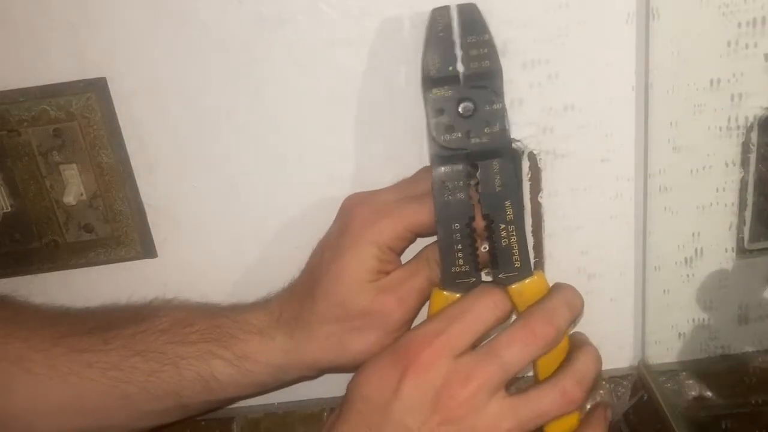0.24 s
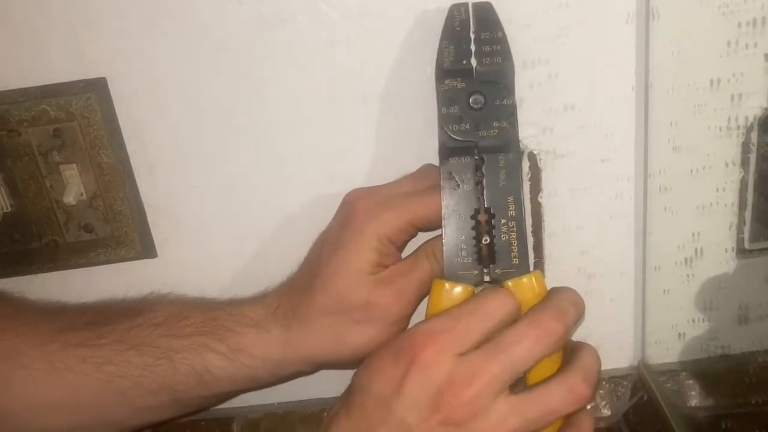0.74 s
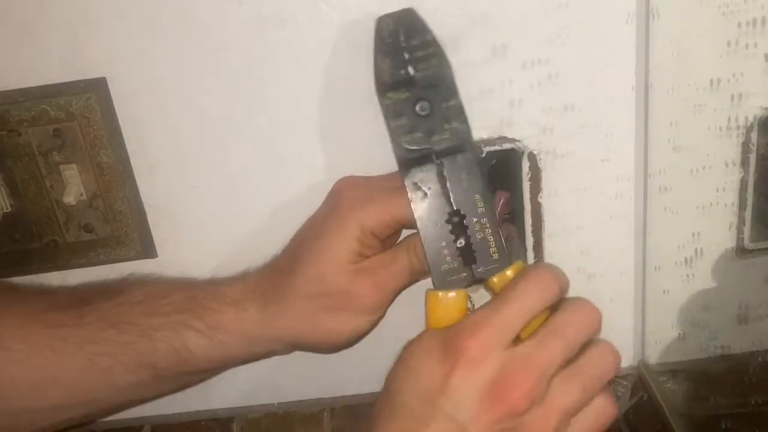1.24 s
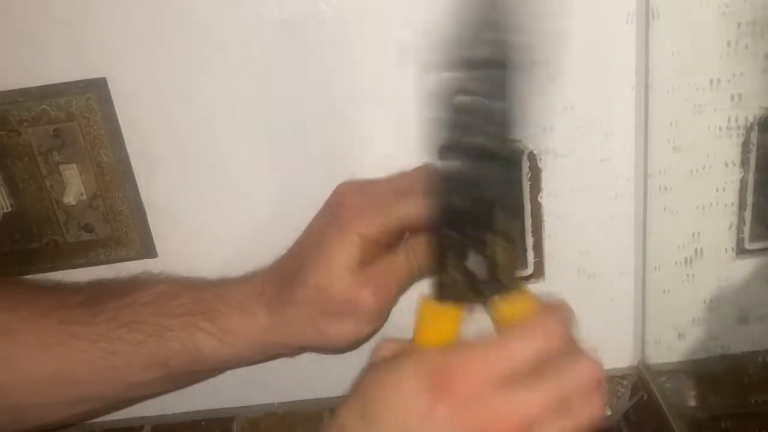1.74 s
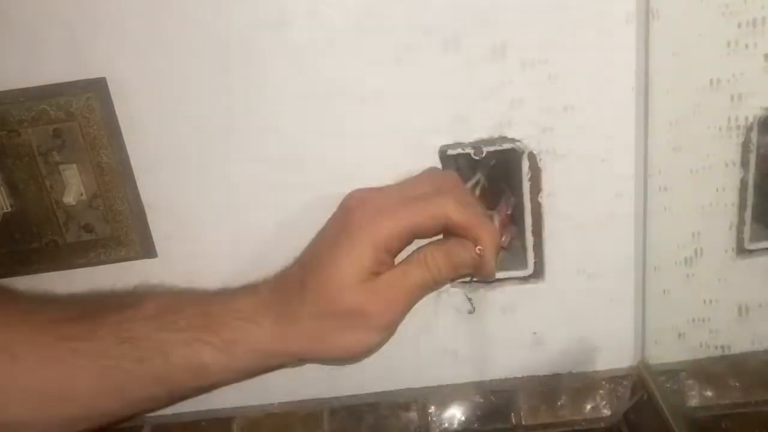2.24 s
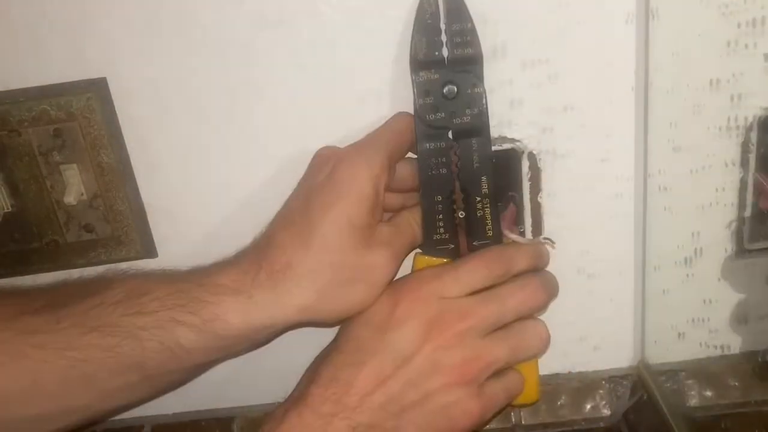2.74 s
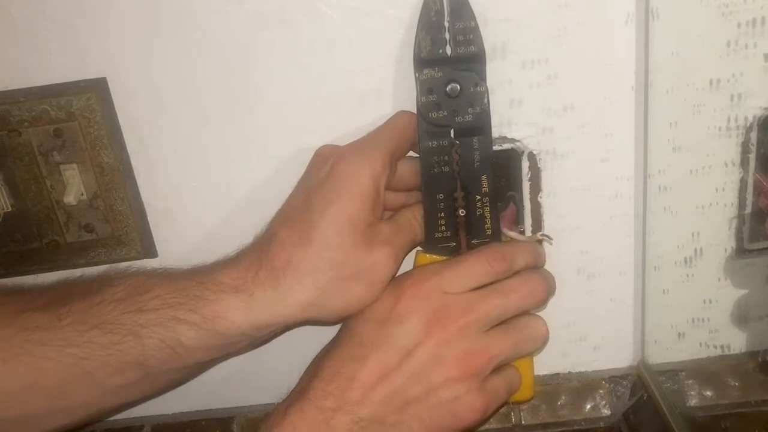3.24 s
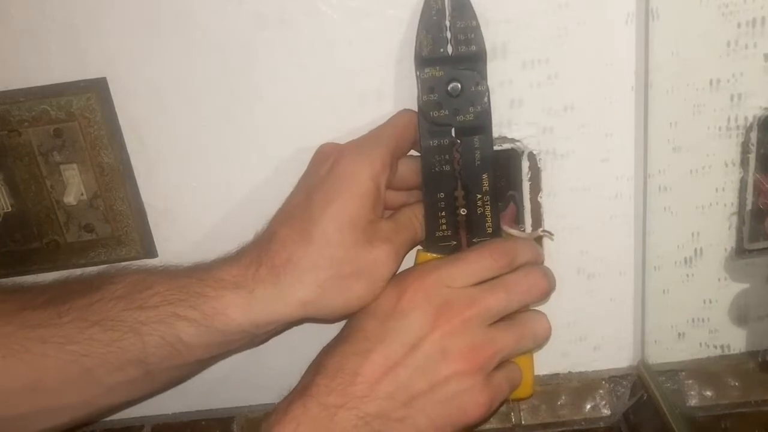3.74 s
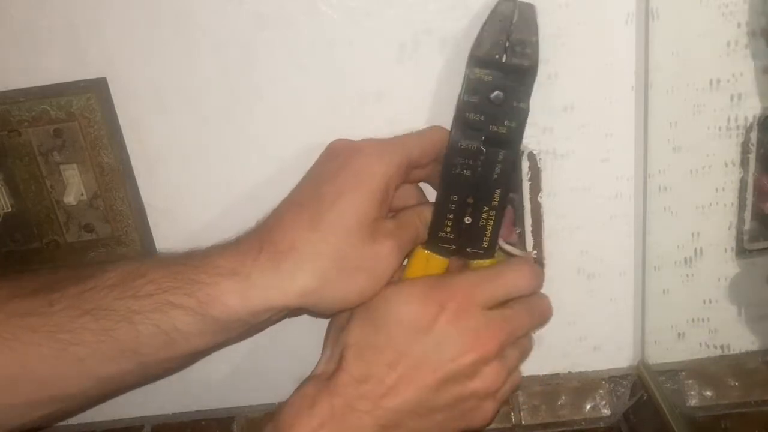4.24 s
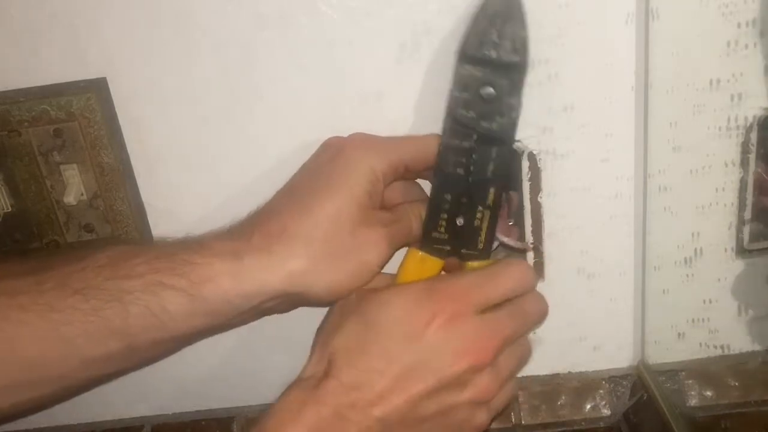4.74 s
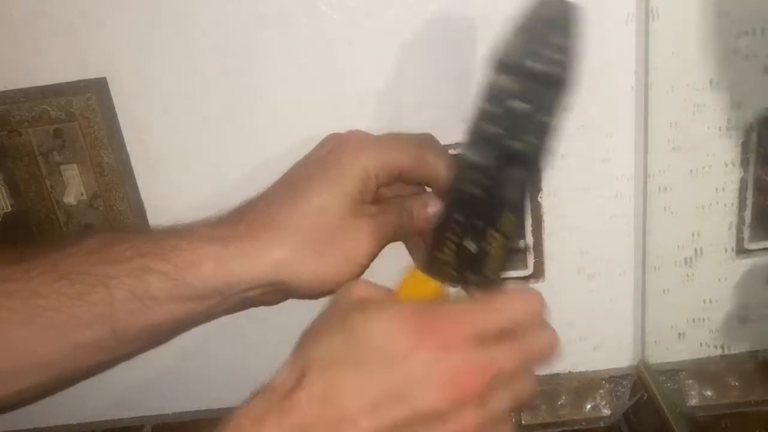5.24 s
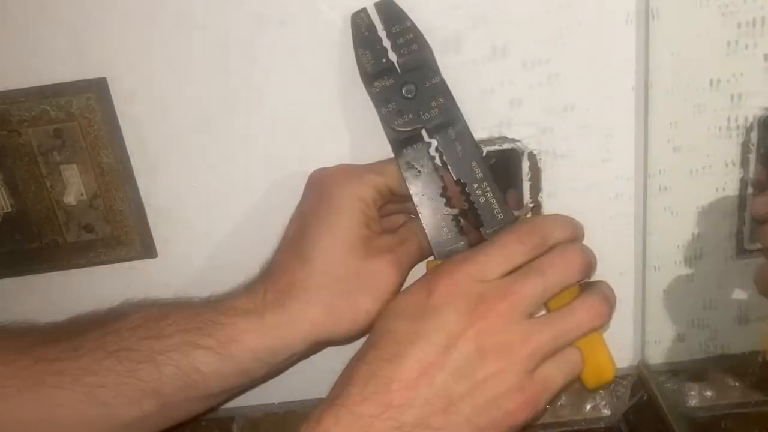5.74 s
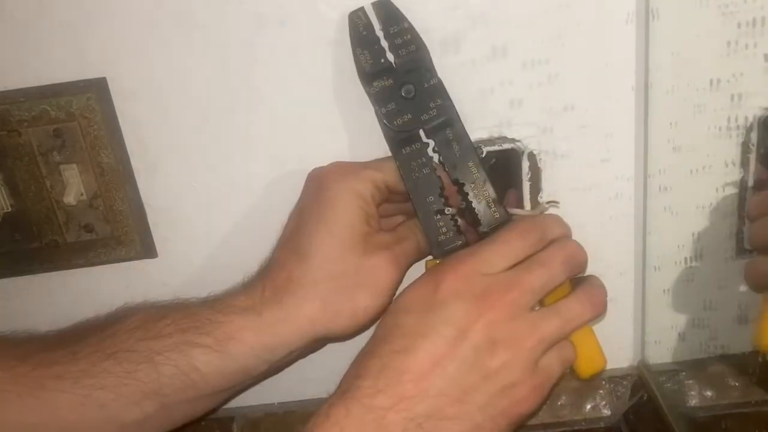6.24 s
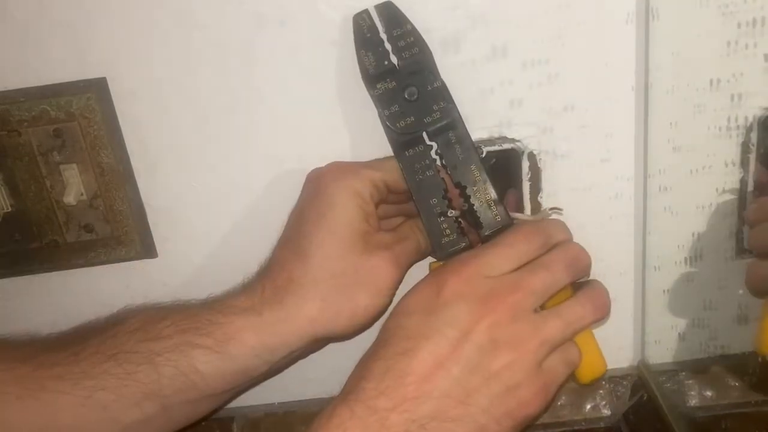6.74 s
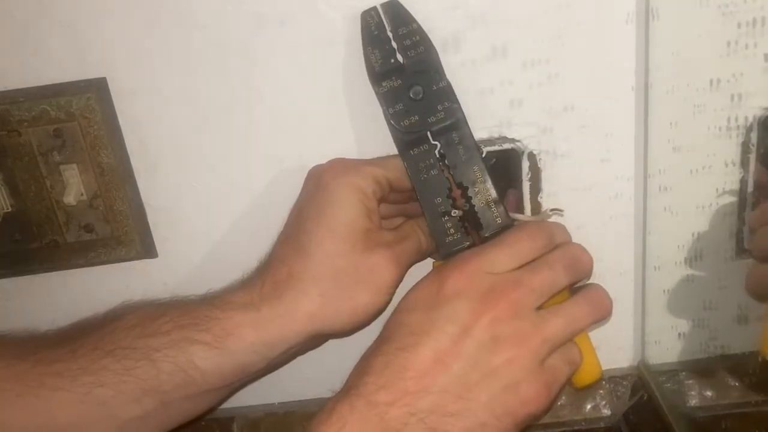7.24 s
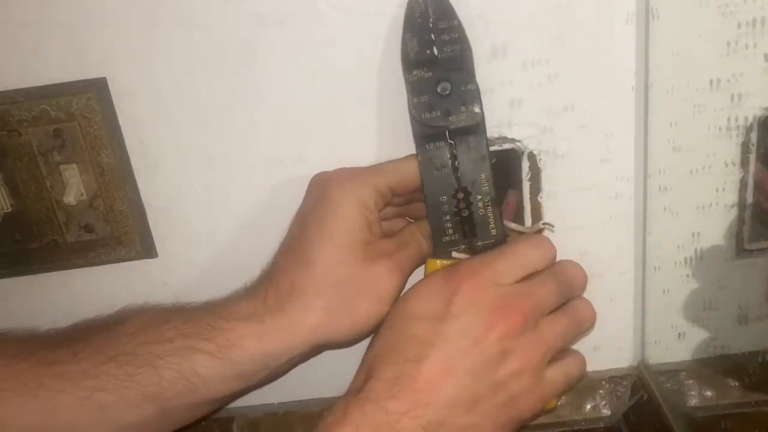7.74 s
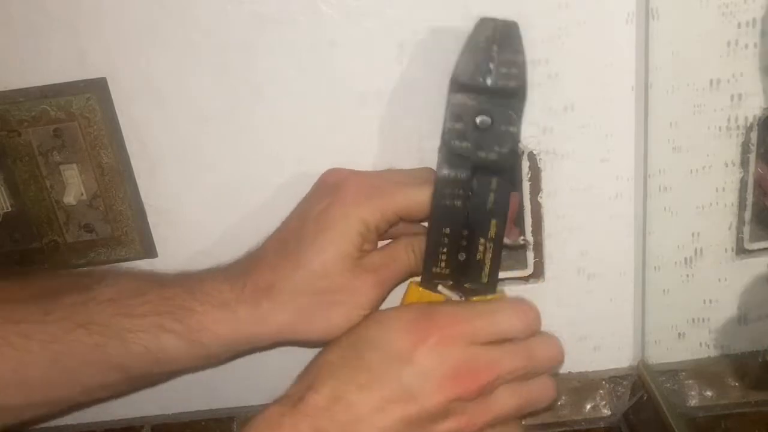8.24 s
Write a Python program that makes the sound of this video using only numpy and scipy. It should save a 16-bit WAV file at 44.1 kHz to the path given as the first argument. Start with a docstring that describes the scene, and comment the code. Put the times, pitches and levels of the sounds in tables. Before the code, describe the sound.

Close stereo sound of hands working at a wall box in a quiet indoor space: plastic handle clacks, steel snaps, gritty rubbing, tiny squeaks of jaws slipping on insulation, and dull hollow thuds when wires are pulled. It begins nearly silent, gets busy, thins to faint creaks, peaks in a bright snip around the middle, and ends in a cluster of clicks.

```python
"""A quiet room murmurs first; then a hand wire stripper works on the wires of an open wall box.
The steel tool clicks and snips as struck modes and noise bursts; tugs knock the box
and make the hollow wall boom, both by modal resonance. Stick-slip grains rub wires and jaws,
narrow noise chirps squeak, stirred air rumbles; a close stereo recorder listens."""
import sys
import numpy as np
from scipy import signal
from scipy.fft import rfft, irfft, next_fast_len
from scipy.io import wavfile

SR = 44100
rng = np.random.default_rng(int(sys.argv[2]) if len(sys.argv) > 2 else 0)


def bounce(signal):
    """Save signal as a 16-bit WAV file at the path given by the first command-line argument."""
    frames = np.transpose(np.atleast_2d(signal))
    limited = np.clip(frames, -1, 1)
    pcm = np.round(limited * 32767).astype(np.int16)
    wavfile.write(sys.argv[1], SR, pcm)


N = 374409   # samples


def from_db(db):
    """Logarithmic level: decibels to amplitude gain."""
    return 10 ** (np.asarray(db) / 20)


def rms_one(x):
    """Normalisation: scale to unit rms."""
    return x / np.sqrt(np.mean(x ** 2) + 1e-20)


def at_hz(points, hz):
    """Interpolation: read a table on a logarithmic frequency axis."""
    table_hz, value = np.array(points)[:, 0], np.array(points)[:, 1]
    return np.interp(np.log(np.maximum(hz, 1)), np.log(table_hz), value)


def coloured(x, spectrum):
    """Spectral shaping: filter noise to the colour of a table, at unit rms."""
    size = next_fast_len(N)
    hz = np.arange(size // 2 + 1) * SR / size
    inside = (hz > .8 * spectrum[0][0]) & (hz < 1.2 * spectrum[-1][0])
    shaped = rfft(x, size) * from_db(at_hz(spectrum, hz)) * inside
    return rms_one(irfft(shaped, size)[..., :N])


# likeness of the two channels of diffuse sound: (frequency [Hz], likeness [0 to 1])
DIFFUSE_LIKENESS = [(60, 0.94), (240, 0.048), (950, 0), (3000, 0), (6000, 0.17), (15000, 1)]


def diffuse(length):
    """Interchannel coherence: a noise pair, alike in bass and treble, unrelated in between."""
    hz = np.arange(length // 2 + 1) * SR / length
    alike = np.clip(at_hz(DIFFUSE_LIKENESS, hz), 0, 1)
    mid, side = rfft(rng.standard_normal((2, length)))
    pair = np.sqrt(1 + alike) * mid + np.sqrt(1 - alike) * side * [[1], [-1]]
    return irfft(pair, length) / np.sqrt(2)


# colour of the building's murmur and hiss: (frequency [Hz], relative level [dB])
ROOM_TONE = [(18, -21.5), (30, -25), (45, -4.5), (68, -2), (170, -17.5), (500, -25), (1500, -35),
             (4000, -39.5), (10000, -42), (16000, -42)]
ROOM_TONE_DB = -63.5   # rms


def room_tone():
    """Diffuse background field: low murmur of the building over a faint hiss."""
    return from_db(ROOM_TONE_DB) * coloured(diffuse(next_fast_len(N)), ROOM_TONE)


def drift(rate):
    """Low-pass random process: slow chance of spread 1, with its corner at rate [Hz]."""
    # computed at every 40th sample
    r = np.exp(-80 * np.pi * rate / SR)
    slow = signal.lfilter([1], [1, -2 * r, r * r], rng.standard_normal(N // 40 + 2002))[2000:]
    return np.interp(np.arange(N) / 40, np.arange(len(slow)), rms_one(slow))


def ring(force, hz, t60):
    """Damped resonance: a unit click sets a sine of height 1 ringing."""
    r, w = from_db(-60 / (t60 * SR)), 2 * np.pi * hz / SR
    return signal.lfilter([0, np.sin(w)], [1, -2 * r * np.cos(w), r * r], force + 1e-18)


MODE_PAN_DB = 4   # each mode radiates its own way: spread of each channel, in opposite senses


def strikes(times, level_db, modes, swell_s, scatter_db, centre_hz=None, focus_db=0, pan_db=MODE_PAN_DB):
    """Modal excitation: a blow feeds each mode during contact, so the ring swells before it dies."""
    out = 0
    level_db = level_db * np.ones((2, 1))      # one row of strengths for each output channel
    chance = rng.standard_normal((len(times), len(modes), 2))
    for k, (hz, mode_db, t60) in enumerate(modes):
        force = np.zeros((len(level_db), N + SR))
        scatter = scatter_db * chance[:, k, 0]
        pan = pan_db * chance[:, k, 1] * [[1], [-1]]
        strength_db = level_db + mode_db + scatter + pan
        if centre_hz is not None:           # the place of the blow favours modes near one pitch
            strength_db = strength_db - focus_db * np.log2(hz / centre_hz) ** 2
        for s, db, swell in zip(times, strength_db.T, swell_s):
            n = np.arange(int(np.clip(swell, 1 / SR, .08) * SR * 2) + 1)
            contact = np.sin(np.pi * (n + .5) / len(n)) * np.pi / len(n)
            push = contact * np.cos(2 * np.pi * hz * n / SR)
            at = round(s * SR)
            force[:, at:at + len(n)] += from_db(db)[:, None] * push
        out = out + ring(force[:, :N], hz, t60) * (-1) ** k   # neighbouring modes in opposite phase
    return out


GRIP_SHIFT_DB = 4.0   # spread of each mode's level as the grip shifts


def rubbed(modes, force, damping, pan_db=MODE_PAN_DB):
    """Damped modes under friction: damping scales the ring times, the shifting grip the mode levels."""
    out = 0
    for k, (hz, db, t60) in enumerate(modes):
        pan = pan_db * drift(3.6) * [[1], [-1]]
        mode_db = db + pan + GRIP_SHIFT_DB * drift(9.0)
        out = out + from_db(mode_db) * ring(force, hz, t60 * damping) * (-1) ** k
    return rms_one(out)


RATTLE_RING = 0.52   # gain of ringing modes against plain noise of gain 1


def bursts(times, level_db, rise_s, centre_hz, spectrum, t60, tail_t60, tail_db, focus, width=1.12, body=None):
    """Two-stage decay: noise rises, drops fast and leaves a fainter rattle, focused on its own pitch."""
    out, t = np.zeros((2, N + SR)), np.arange(SR // 4) / SR
    # doubled in length so that late bursts still find noise
    noise = np.tile(coloured(rng.standard_normal(N), spectrum), 2)
    if body:        # the rattle sings in the modes of the thing that rattles
        singing = rubbed(body, noise[:N], 1.0, pan_db=1.5)[0]
        noise = noise + RATTLE_RING * np.tile(singing, 2)
    for s, db, rise, hz in zip(times, level_db.T, np.clip(rise_s, 2e-4, .04), centre_hz):
        at = round(s * SR)
        grit = noise[at:at + len(t)]
        band = signal.butter(1, [hz / width, hz * width], "band", fs=SR)
        grit = rms_one(grit + focus * signal.lfilter(*band, grit))
        after = np.maximum(t - rise, 0)
        decay = from_db(-60 * after / t60) + from_db(tail_db - 60 * after / tail_t60)
        shape = np.minimum(t / rise, 1) * decay
        out[:, at:at + len(t)] += from_db(db)[:, None] * shape * grit
    return out[:, :N]


# clicks, levels before the layer trims:
# (time [s], plastic clack [dB], steel snap [dB], treble tick [dB])
CLICKS = [(0.612, -36.5, -64, -76), (0.795, -53, -73, -70), (0.945, -29.5, -55.5, -56),
          (0.971, -37, -70, -57), (1.052, -29, -83, -70), (1.091, -33, -70, -90), (1.153, -35, -67, -80),
          (1.225, -34, -58.5, -62), (1.291, -27, -69, -49.5), (1.364, -25.5, -51, -82),
          (1.428, -18.5, -32, -38.5), (1.517, -29, -53, -52.5), (1.671, -17.5, -33.5, -31.5),
          (1.71, -19.5, -32, -38), (2.011, -48, -55.5, -62), (2.046, -32.5, -60, -69),
          (2.116, -28.5, -52.5, -52.5), (2.175, -58, -77, -56), (2.324, -35.5, -85, -79),
          (2.339, -33.5, -61, -60), (2.44, -39, -51, -55), (2.518, -22, -46, -55.5),
          (2.628, -38.5, -54, -58.5), (2.753, -51, -55, -58.5), (2.799, -32, -59, -66),
          (2.856, -54, -58.5, -56), (2.993, -32, -48, -75), (3.057, -45, -61, -56.5),
          (3.489, -44, -63.5, -71), (3.564, -43, -50.5, -55.5), (3.678, -54, -66, -77),
          (3.767, -32.5, -51, -52.5), (3.942, -31, -47.5, -58), (3.961, -29, -50, -62),
          (4.001, -17.5, -62, -68), (4.222, -34, -36.5, -37.5), (4.262, -60, -63, -51),
          (4.323, -47, -57, -75), (4.434, -24, -30.5, -41.5), (4.551, -22, -73, -70),
          (4.642, -37, -52, -79), (4.669, -32.5, -62, -75), (4.722, -29.5, -47, -58.5),
          (4.9, -54, -75, -71), (4.982, -50, -80, -87), (5.037, -18, -33, -33.5), (5.158, -30, -39, -75),
          (5.175, -15.5, -48, -31), (5.181, -9, -11.5, -38), (5.257, -40, -41, -68), (5.372, -36, -58, -62),
          (5.446, -37, -69, -68), (5.467, -33.5, -58, -70), (5.492, -40, -42.5, -56.5),
          (5.629, -40.5, -55.5, -77), (5.745, -42, -63, -66), (5.814, -22.5, -42.5, -56.5),
          (5.966, -34, -64.5, -74), (5.978, -30.5, -57.5, -65), (6.043, -34.5, -73.5, -77),
          (6.076, -15.5, -33.5, -45), (6.21, -53, -55.5, -64), (6.289, -54.5, -52.5, -57),
          (6.335, -53, -60.5, -67.5), (6.358, -47.5, -60, -60.5), (6.423, -47, -61.5, -61),
          (6.554, -50, -60, -87), (6.62, -42.5, -61, -82.5), (6.682, -60, -73.5, -84),
          (6.965, -44, -56, -79.5), (7.074, -50, -50, -73), (7.353, -62.5, -64.5, -52),
          (7.382, -33, -53, -54.5), (7.392, -23, -40.5, -48.5), (7.409, -32.5, -35, -39),
          (7.432, -22, -43, -53.5), (7.579, -34.5, -62, -72), (7.713, -35, -48, -64),
          (7.902, -33, -53, -58), (7.964, -45, -58.5, -60), (8.072, -37.5, -32.5, -42.5),
          (8.103, -20, -40.5, -55), (8.195, -27.5, -50, -82), (8.227, -45, -50, -74),
          (8.249, -24, -33, -54.5), (8.314, -28.5, -43.5, -57), (8.338, -26, -52, -77),
          (8.366, -23, -41, -51.5), (8.416, -20.5, -36.5, -52), (8.451, -22, -35, -50.5),
          (8.472, -18, -34.5, -47), (8.484, -25, -45, -55)]
# modes of handle and insulation, then of the jaws: (frequency [Hz], relative level [dB], t60 [s])
PLASTIC = [(938, -3.5, 0.062), (1046, 3, 0.026), (1012, -1, 0.083), (1184, -7.5, 0.04), (1261, -6.5, 0.055),
           (1370, -5, 0.03)]
STEEL = [(1781, 2, 0.011), (1817, 4.5, 0.056), (2244, -10, 0.08), (2510, -6, 0.078), (2774, -7, 0.042),
         (2880, -5.5, 0.036), (3403, -10, 0.091), (3616, -11, 0.043), (4092, -10.5, 0.066),
         (4430, -12, 0.04), (5600, -21, 0.027)]
# noise colours of snap, tick, shutting jaws and dry crunch: (frequency [Hz], relative level [dB])
CRACK = [(900, -20), (1450, -0.5), (1800, 0), (2300, 3), (2950, 6), (3350, 5.5), (3900, 2.5), (4600, -2.5),
         (5200, -11.5), (6500, -14)]
TICK = [(4500, -3.5), (6000, 1.5), (8500, 4.5), (12000, 1.5), (16000, -8)]
SLAM = [(2200, -9), (2850, 2), (3300, 0.5), (4000, 1), (4800, -17)]
CRUNCH = [(250, 4), (700, -1.5), (1050, -7), (1400, -16.5), (2000, -19), (2700, -23.5)]
# the wire parts and the jaws slam shut: (time [s], ring of all modes [dB], bright crack [dB])
SNIP = (5.183, -28.5, -5.5)
# the snap sits higher on the first wire than on the later ones, which start at REGRIP_S
FIRST_SNAP_HZ, LATER_SNAP_HZ, REGRIP_S = 2860, 1744, 1.8
# the handle creaks five times at an even pace; level before the layer trims
CREAK_START_S, CREAK_STEP_S, CREAK_DB = 3.164, .055, -48


def tool_clicks():
    """Impact of light bodies: clack of handle and insulation, snap and ring of steel jaws, thin tick."""
    creaks = [(CREAK_START_S + CREAK_STEP_S * k, CREAK_DB, CREAK_DB - 24.5, CREAK_DB - 38) for k in range(5)]
    s, clack_db, snap_db, tick_db = np.transpose(CLICKS + creaks)
    snap_hz = np.where(s < REGRIP_S, FIRST_SNAP_HZ, LATER_SNAP_HZ)
    snap_hz = snap_hz * 2 ** (.12 * rng.standard_normal(len(s)))   # spread in octaves
    # the hand shades each click differently, left against right in dB
    sides = 3.0 * rng.standard_normal(len(s)) * [[1], [-1]]
    rise = np.full(len(s), .0012)   # s
    clack = strikes(s, clack_db + sides - 14, PLASTIC, 0.18 * rise, scatter_db=4.5)
    steel = strikes(s, snap_db + sides - 9.5, STEEL, 2.3 * rise, scatter_db=1.5,
                    centre_hz=snap_hz, focus_db=5.5)
    snap = bursts(s, snap_db + sides + 0.5, rise, snap_hz, CRACK,
                  t60=0.011, tail_t60=0.17, tail_db=-5.0, focus=1.8, body=STEEL)
    tick = bursts(s, np.tile(tick_db + 4.5, (2, 1)), rise, 3 * snap_hz, TICK,
                  t60=0.019, tail_t60=0.14, tail_db=-10, focus=0.057)
    crunch = bursts(s, clack_db + sides - 14.5, rise, np.full(len(s), 1150), CRUNCH,
                    t60=0.062, tail_t60=0.12, tail_db=-13.0, focus=5.6, body=PLASTIC)
    slam_ring = strikes(SNIP[:1], np.array(SNIP[1:2]), STEEL, [.0006], scatter_db=3.5)
    slam_crack = bursts(SNIP[:1], np.full((2, 1), SNIP[2]), rise, [3900], SLAM,
                        t60=0.012, tail_t60=0.18, tail_db=-12.5, focus=2.7, body=STEEL)
    return clack + crunch + steel + snap + tick + slam_ring + slam_crack


# knocks and tugs on the box, levels before the layer trims:
# (time [s], box [dB], lower long side [dB], upper long side [dB])
KNOCKS = [(0.945, -44, -59, -71), (1.16, -41, -65, -80), (1.294, -35.5, -49, -48), (1.368, -37, -58, -46),
          (1.43, -22, -45.5, -27), (1.671, -16, -34, -25), (1.705, -29, -35, -37), (1.866, -47, -55, -75),
          (2.115, -35.5, -53, -36.5), (2.523, -26.5, -43, -59), (2.751, -32.5, -51, -46),
          (2.857, -34, -50.5, -42), (2.997, -27, -50.5, -45), (3.033, -36, -56, -49),
          (3.563, -34, -62, -57.5), (3.791, -30, -57, -45.5), (3.915, -35, -45, -65),
          (3.947, -33, -33.5, -45), (4.023, -47, -44.5, -65), (4.224, -37, -55, -51),
          (4.437, -23.5, -43, -42), (4.468, -40.5, -61, -64), (4.556, -23, -31, -46),
          (4.899, -30.5, -54.5, -74), (5.04, -17, -40, -37), (5.129, -30.5, -41.5, -57),
          (5.176, -13.5, -36, -27), (5.27, -37, -48.5, -35), (5.739, -37, -54.5, -75),
          (5.814, -22, -49, -38), (5.86, -42.5, -65, -54), (6.005, -32.5, -40.5, -50),
          (6.079, -12.5, -24, -27.5), (6.213, -34, -44, -63.5), (6.287, -25.5, -46, -52),
          (6.336, -33.5, -40.5, -49.5), (6.424, -33, -41, -52), (6.474, -59, -51.5, -61.5),
          (6.561, -39.5, -50.5, -65.5), (6.625, -44.5, -49, -58), (6.971, -37.5, -48, -52.5),
          (7.049, -29.5, -46.5, -61), (7.133, -34.5, -43, -68), (7.39, -10, -28, -32),
          (7.404, -18, -14, -26.5), (7.432, -23.5, -21, -45), (7.519, -53, -41.5, -61),
          (7.61, -43.5, -51, -57), (7.699, -22, -37.5, -59), (7.901, -32.5, -59, -71),
          (8.073, -23, -52, -38), (8.25, -30, -66, -47), (8.329, -49, -71, -44), (8.427, -34.5, -61, -37)]
# modes of the box, then of its long sides, the lower a close pair:
# (frequency [Hz], relative level [dB], t60 [s])
BOX = [(271.2, -7, 0.11), (338, -2, 0.19), (404, 7, 0.036), (544.5, 2, 0.077), (741, -8, 0.09),
       (894, -6, 0.046)]
BOX_SIDES = [(448.7, -6, 0.13), (460.5, -3, 0.15), (629.3, -4.5, 0.16)]
# contact lasts longer under a stronger tug: lightest, extra at 0 dB, power of the strength
LIGHT_CONTACT_S, HEAVY_CONTACT_S, CONTACT_POWER = 0.0042, 0.02, 0.94


def box_knocks():
    """Contact time and resonance: the box rings soon; its two long sides take longer to swing up."""
    s, box_db, low_db, high_db = np.transpose(KNOCKS)
    contact = LIGHT_CONTACT_S + HEAVY_CONTACT_S * from_db(CONTACT_POWER * box_db)
    box = strikes(s, box_db - 16.5, BOX, 0.51 * contact, scatter_db=2.5)
    low = strikes(s, low_db + 11, BOX_SIDES[:-1], 1.4 * contact, scatter_db=1.5, pan_db=1)
    high = strikes(s, high_db + 8, BOX_SIDES[-1:], 1.3 * contact, scatter_db=1, pan_db=1)
    # wires jammed in the box crunch; a longer contact makes the crunch rise more slowly
    crunch = bursts(s, np.tile(box_db - 16.0, (2, 1)), 2 * contact, np.full(len(s), 900), CRUNCH,
                    t60=0.035, tail_t60=0.3, tail_db=-3.5, focus=0)
    return box + low + high + crunch


# pulls that make the wall panel boom: (time [s], level [dB], centre frequency [Hz])
THUDS = [(0.961, -38, 110), (1.431, -33, 112), (1.686, -37, 121), (1.797, -23.5, 80.5), (1.85, -43, 80),
         (2.401, -38.5, 128), (2.532, -34.5, 107), (2.754, -42, 143), (2.81, -34, 183), (2.867, -28.5, 195),
         (3.017, -23, 94), (3.04, -31, 96.5), (3.563, -37.5, 184), (3.793, -43, 171), (3.942, -31.5, 112),
         (4.448, -32.5, 105), (4.558, -25.5, 122), (4.724, -32, 102), (4.904, -38.5, 111),
         (5.059, -16, 104), (5.189, -10.5, 101), (5.493, -41, 89.7), (5.742, -36, 103), (5.812, -21, 159.5),
         (6.077, -13, 193), (6.095, -11.5, 104), (6.309, -26, 111), (6.437, -36, 116.7),
         (6.623, -36, 126.3), (6.948, -33.5, 110.5), (7.05, -42.5, 121), (7.149, -30.5, 111),
         (7.393, -10, 164.3), (7.412, -13, 128), (7.438, -14.5, 178.5), (7.709, -16.5, 127),
         (7.92, -39, 113.2), (8.089, -32, 99), (8.205, -23.5, 90)]
# modes of the wall panel: (frequency [Hz], relative level [dB], t60 [s])
WALL = [(75, -7, 0.39), (101.9, -0.5, 0.33), (120.2, -2.5, 0.2), (150.4, -3, 0.24), (189.5, -5.5, 0.15),
        (219.4, -10, 0.27)]
THUD_SWELL_S = 0.0206


def wall_thuds():
    """Panel resonance: a pull slowly swings up the modes nearest its place, around the listed time."""
    s, level_db, centre_hz = np.transpose(THUDS)
    swell = np.full(len(s), THUD_SWELL_S)
    return strikes(s - 0.63 * swell, level_db, WALL, swell, scatter_db=1.0,
                   centre_hz=centre_hz, focus_db=26.0, pan_db=0)


def strokes(rows, rise_db_per_s, fall_db_per_s):
    """Power summation: strokes rise, hold and fall, overlaps add in power; one gain per level column."""
    t, power = np.arange(0, N + 64, 64) / SR, 0
    for start, hold, *level_db in rows:
        before = np.maximum(start - t, 0)
        after = np.maximum(t - start - hold, 0)
        lack_db = rise_db_per_s * before + fall_db_per_s * after
        power = power + from_db(np.array(level_db)[:, None] - lack_db) ** 2
    return [np.interp(np.arange(N) / SR, t, np.sqrt(p)) for p in power]


def grains(per_s, spread_db, clump_db):
    """Stick-slip: random clicks of uneven size that come in clumps."""
    sizes = from_db(spread_db * np.minimum(rng.exponential(1, N), 5)) * rng.choice([-1, 1], N)
    chance = per_s * from_db(clump_db * drift(14.0)) / SR
    return sizes * (rng.random(N) < chance)


# the hands lean on the box and shift it, then the resting grip on the wire, before the layer trims:
# (start [s], hold [s], wall rumble [dB], box rattle [dB])
SHOVES = [(0.99, 0.014, -54, -49.5), (1.12, 0.27, -55, -51.5), (1.44, 0.015, -43, -34.5),
          (1.69, 0.077, -33, -34.5), (2.11, 0.022, -57, -45.5), (2.37, 0.022, -54, -43.5),
          (2.53, 0.022, -46.5, -45), (2.76, 0.064, -50, -45.5), (3.0, 0.018, -44, -50),
          (3.17, 0.48, -63, -60), (3.57, 0.05, -66, -53.5), (3.68, 0.0091, -51.5, -52),
          (3.78, 0.095, -66, -50), (3.95, 0.042, -37, -42), (4.07, 0.068, -55, -45.5),
          (4.23, 0.01, -48.5, -52.5), (4.33, 0.14, -58, -53), (4.56, 0.034, -43.5, -46),
          (4.7, 0.052, -40.5, -45), (4.88, 0.041, -54, -53), (5.06, 0.21, -36, -42),
          (5.3, 0.21, -48.5, -46.5), (5.5, 0.029, -60, -51.5), (5.62, 0.031, -67, -65),
          (5.81, 0.029, -39.5, -49), (5.98, 0.13, -42, -52), (6.13, 0.3, -41.5, -45.5),
          (6.43, 0.022, -45, -49.5), (6.6, 0.029, -62.5, -53), (6.8, 0.049, -57.5, -76),
          (7.07, 0.04, -40.5, -49), (7.24, 0.048, -45.5, -53), (7.45, 0.15, -37.5, -50),
          (7.84, 0.023, -47.5, -47), (8.1, 0.092, -43.5, -36.5), (8.27, 0.13, -52, -51.5),
          (8.44, 0.038, -46, -37)]
GRIP = (0.96, 7.6, -63, -68.5)
# jaws and wires slide, before the layer trims:
# (start [s], hold [s], scrape [dB], rasp [dB], hiss [dB])
SLIDES = [(0.96, 0.22, -68, -86, -82), (1.22, 0.084, -63.5, -73, -57.5), (1.3, 0.17, -60, -56.5, -63),
          (1.7, 0.07, -47, -50, -56), (1.78, 0.076, -50.5, -55, -61), (2.11, 0.046, -66, -70, -68),
          (2.33, 0.05, -76.5, -77, -68.5), (2.385, 0.0073, -59, -67, -64), (2.52, 0.025, -57, -91, -87),
          (2.63, 0.076, -63, -99, -87), (2.75, 0.048, -54.5, -75, -83), (3.01, 0.031, -61.5, -62, -75),
          (3.94, 0.031, -46.5, -61, -59.5), (4.03, 0.2, -59.5, -72.5, -69.5), (4.24, 0.23, -58, -71, -74.5),
          (4.56, 0.029, -55, -69, -83), (4.65, 0.068, -48.5, -65, -69.5), (4.87, 0.013, -51, -87, -75),
          (4.95, 0.12, -58, -90, -92), (5.07, 0.17, -51, -64.5, -65), (5.37, 0.037, -51.5, -59.5, -66),
          (5.46, 0.051, -58, -51.5, -57), (5.55, 0.076, -60.5, -56.5, -61), (5.68, 0.036, -81, -64, -69.5),
          (5.81, 0.035, -63, -90, -87), (6.085, 0.03, -45.5, -64, -70), (7.1, 0.15, -69.5, -87, -100),
          (7.6, 0.17, -68.5, -79.5, -78), (7.8, 0.092, -63.5, -74, -63.5), (7.9, 0.017, -54, -70.5, -80.5),
          (8.09, 0.077, -44.5, -55.5, -60), (8.2, 0.038, -48.5, -68, -83), (8.26, 0.026, -53, -75, -69),
          (8.33, 0.041, -47.5, -78.5, -64), (8.43, 0.05, -55, -64, -73)]
# noise colours of the sliding: (frequency [Hz], relative level [dB])
SCRAPE = [(1000, 4), (1500, 13.5), (2000, -2), (2800, -1.5), (3600, -24)]
RASP = [(3000, -3.5), (4300, 1), (5200, -8.5), (6000, -15)]
HISS = [(5000, -12), (6200, 0.5), (8500, 10), (11000, 7.5), (14000, 5.5), (16000, -2.5)]
SHOVE_RISE_DB_PER_S, SHOVE_FALL_DB_PER_S = 195, 129
SLIDE_RISE_DB_PER_S, SLIDE_FALL_DB_PER_S = 247.5, 195.5
PRESSURE_WAVER_DB = 1.5   # spread of the fine grains' level


def rubbing():
    """Friction excitation: it shakes wall and box, scrapes steel, rasps on teeth, hisses on insulation."""
    wall_gain, box_gain = strokes(SHOVES + [GRIP], SHOVE_RISE_DB_PER_S, SHOVE_FALL_DB_PER_S)
    scrape_gain, rasp_gain, hiss_gain = strokes(SLIDES, SLIDE_RISE_DB_PER_S, SLIDE_FALL_DB_PER_S)
    rumble = rubbed(WALL, rng.standard_normal(N), damping=0.34, pan_db=0)
    wall = wall_gain * from_db(2.7 * drift(16.0)) * rumble

    slips = grains(600, spread_db=4.0, clump_db=5.5)
    rattle = 0.97 * rubbed(BOX, slips, damping=0.83) + 0.38 * rubbed(BOX_SIDES, slips, damping=1.0)
    box = box_gain * (rattle + 0.2 * rubbed(PLASTIC, slips, damping=0.7))

    fine = grains(4800, spread_db=2.5, clump_db=5.5) * from_db(PRESSURE_WAVER_DB * drift(5.2))
    catches = grains(500, spread_db=4.5, clump_db=6.0)   # the edge bites and lets go
    scrape = 0.49 * coloured(fine, SCRAPE) + 0.7 * rubbed(PLASTIC[:4] + STEEL[:6], catches, damping=0.7)
    rasp = 0.53 * coloured(fine + .3 * catches, RASP) + 0.78 * rubbed(STEEL[5:], catches, damping=0.6)
    hiss = coloured(fine, HISS)
    return wall + box + scrape_gain * scrape + rasp_gain * rasp + hiss_gain * hiss


# the hand stirs the air: (start [s], hold [s], level of the part common to both sides [dB])
DRAUGHT = [(1.3, 2.1, -72), (1.75, 0.068, -34), (4.6, 0.36, -54.5), (5.18, 0.08, -32.5), (7.5, 1, -61)]
GUST_RISE_DB_PER_S, GUST_FALL_DB_PER_S = 120, 79


def draught():
    """Air-flow pressure noise: moving air pushes both microphones with a lumpy rumble."""
    sos = signal.butter(3, [22, 58], "band", fs=SR, output="sos")
    shared, *own = signal.sosfilt(sos, rng.standard_normal((3, N)))
    gust_gain = strokes(DRAUGHT, GUST_RISE_DB_PER_S, GUST_FALL_DB_PER_S)[0]
    return gust_gain * rms_one(shared + 0.18 * np.array(own))


# squeaks and rings as the jaws slip on the insulation: (time [s], level [dB], pitch [Hz])
SQUEAKS = [(2.383, -39, 2750), (2.384, -46.5, 1920), (2.398, -54, 2150), (2.399, -58, 3430),
           (2.442, -43, 1690), (2.63, -41.5, 1590), (3.061, -47.5, 1560), (4, -37.5, 1073),
           (4.575, -54.5, 1020), (5.157, -40, 1830), (5.369, -45, 1050), (5.465, -46, 1070),
           (7.9, -41.5, 2470), (7.904, -37, 1840), (7.918, -45, 2450), (7.987, -56.5, 1790)]
SQUEAK_RISE_S = 0.0031


def squeaks():
    """Narrow-band noise: short coloured chirps of rubbing, each around a fixed pitch."""
    s, level_db, hz = np.transpose(SQUEAKS)
    return bursts(s, np.tile(level_db, (2, 1)), np.full(len(s), SQUEAK_RISE_S), hz, CRACK,
                  t60=0.038, tail_t60=0.07, tail_db=-20, focus=58.0, width=1.05)


# shading by the recorder's body: (frequency [Hz], left minus right [dB])
BALANCE_DB = [(60, 1.5), (250, 0.5), (453, 2.5), (600, -3.5), (1200, -6.5), (2200, -5), (3000, -0.5),
              (15000, 0)]
# decay time of the room: (frequency [Hz], t60 [s])
ROOM_T60 = [(100, 0.18), (1000, 0.31), (4000, 0.092), (12000, 0.24)]
# strength of the room's tail: (frequency [Hz], relative level [dB])
ROOM_WET = [(100, -16), (450, -8), (650, -2), (2000, -2), (10000, -6)]


def microphones(pair):
    """Direct and reverberant field: sound shaded by the recorder, plus a tail dying band by band."""
    t, edges, tails = np.arange(SR // 2) / SR, 60 * 2 ** np.arange(0, 8.5), 0   # octave bands
    white = diffuse(len(t))
    for low, high in zip(edges, edges[1:]):
        hz = np.sqrt(low * high)
        fade = from_db(-60 * t / at_hz(ROOM_T60, hz)) * np.minimum(t / 0.0055, 1)
        band = signal.sosfilt(signal.butter(2, [low, high], "band", fs=SR, output="sos"), white)
        tails = tails + band * fade / np.sqrt(np.sum(fade ** 2)) * from_db(at_hz(ROOM_WET, hz))
    size = next_fast_len(N + len(t))
    hz = np.arange(size // 2 + 1) * SR / size
    shade = from_db(at_hz(BALANCE_DB, hz) / 2 * [[1], [-1]])
    direct = rfft(pair, size) * shade
    reverberant = rfft(pair.mean(axis=0), size) * rfft(tails, size)
    return irfft(direct + reverberant, size)[:, :N]


def scene():
    """Superposition: tool, box and wall through the room, over draught and room tone."""
    work = tool_clicks() + box_knocks() + wall_thuds() + rubbing() + squeaks()
    return room_tone() + microphones(work) + draught()


# the right channel trails the left by 0.3 ms in the treble: (frequency [Hz], phase behind [rad])
RIGHT_PHASE = [(0, 0), (480, 0.1), (560, 2.0), (700, -1.2), (1100, -.7), (1800, -.6), (2500, -1.6),
               (3300, -2.6), (4900, 0), (15100, 6 * np.pi), (18500, 8 * np.pi)]
CUTOFF_HZ = 15700


def record(dry):
    """Phase delay and limited band: the right channel is shifted, peaks past 0.96 clip, the top is cut."""
    size = next_fast_len(N + 2048)
    behind = np.interp(np.arange(size // 2 + 1) * SR / size, *np.transpose(RIGHT_PHASE))
    pair = irfft(rfft(dry, size) * np.exp(-1j * behind * [[0], [1]]), size)[:, :N]
    top = signal.ellip(8, .5, 60, CUTOFF_HZ, fs=SR, output="sos")
    return signal.sosfilt(top, np.clip(pair, -.96, .96))


dry = scene()
out = record(dry)
bounce(out)
```